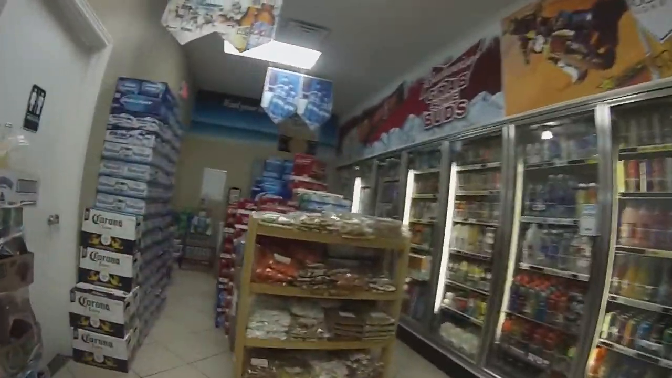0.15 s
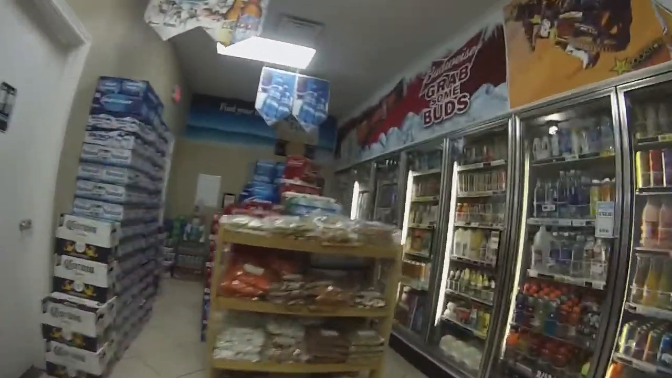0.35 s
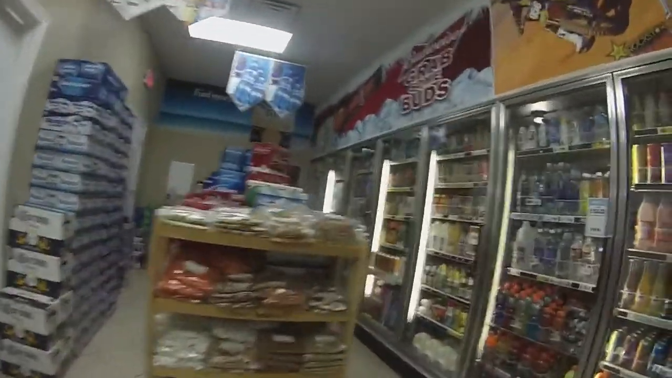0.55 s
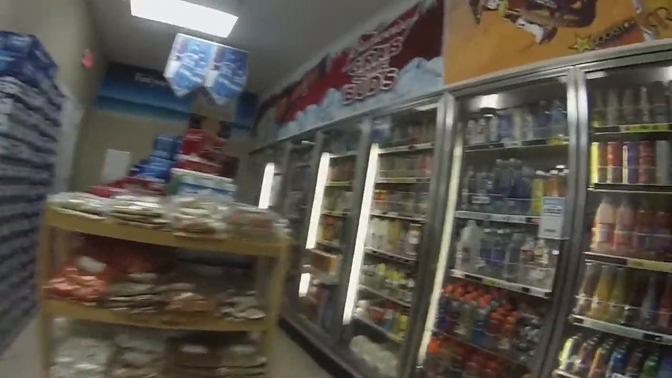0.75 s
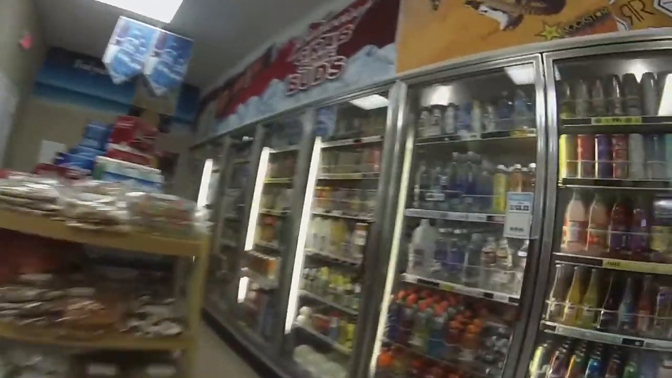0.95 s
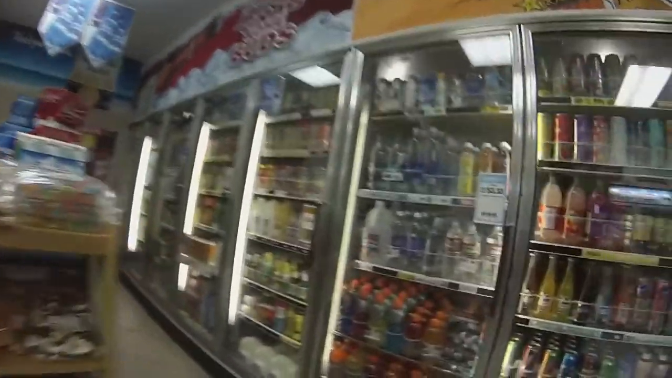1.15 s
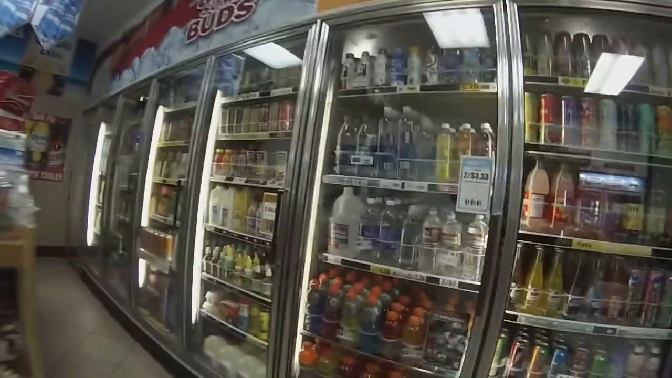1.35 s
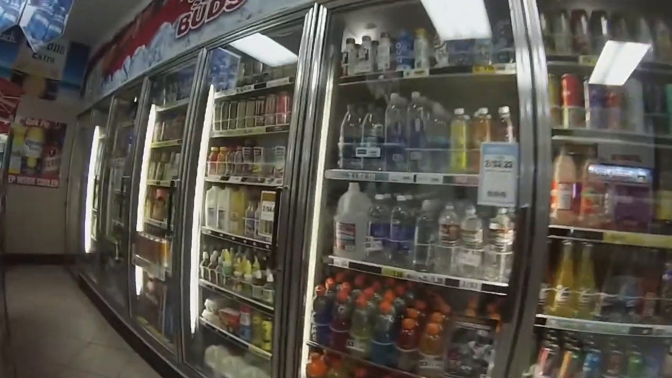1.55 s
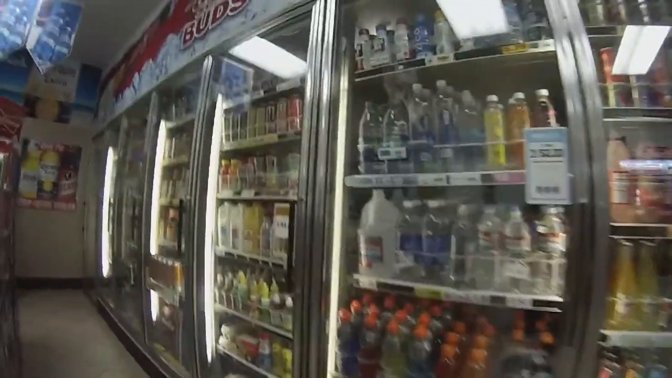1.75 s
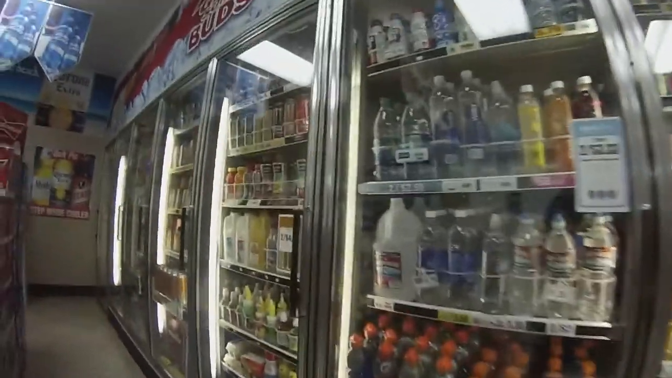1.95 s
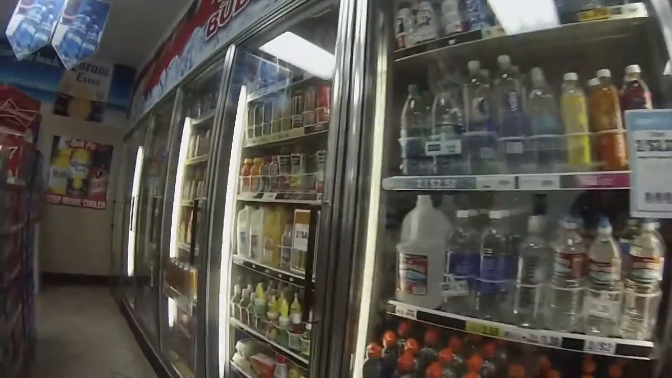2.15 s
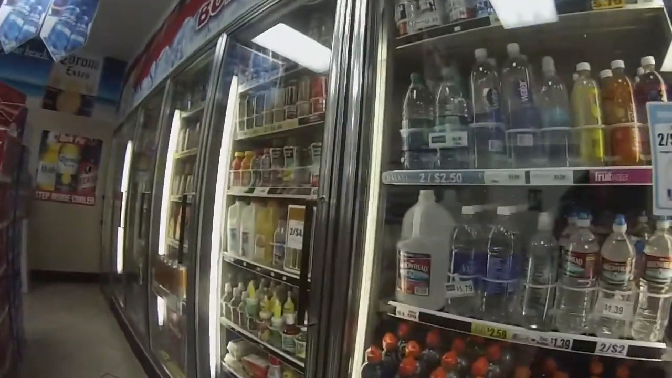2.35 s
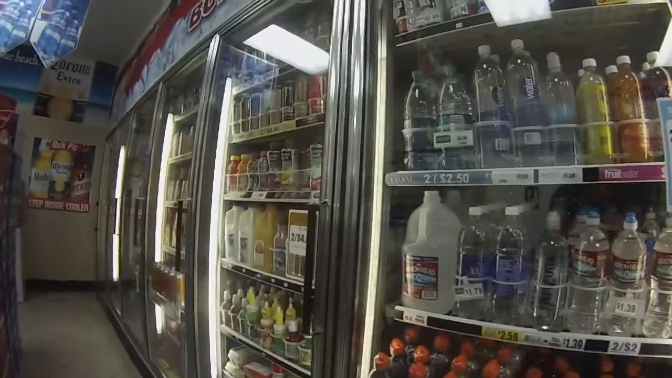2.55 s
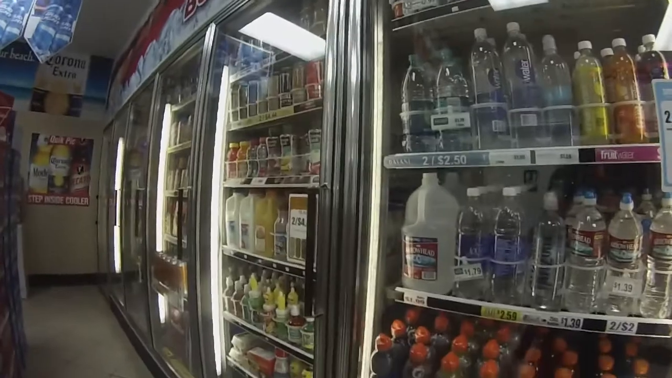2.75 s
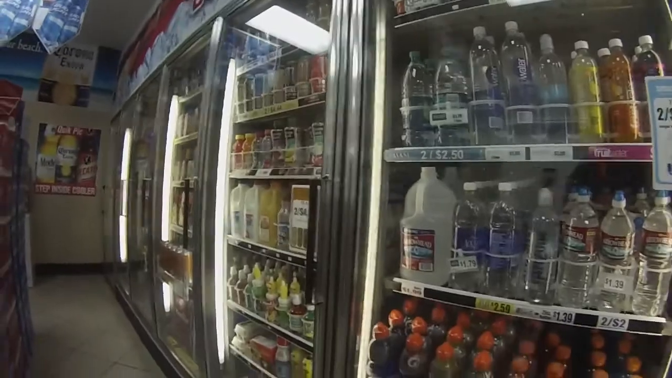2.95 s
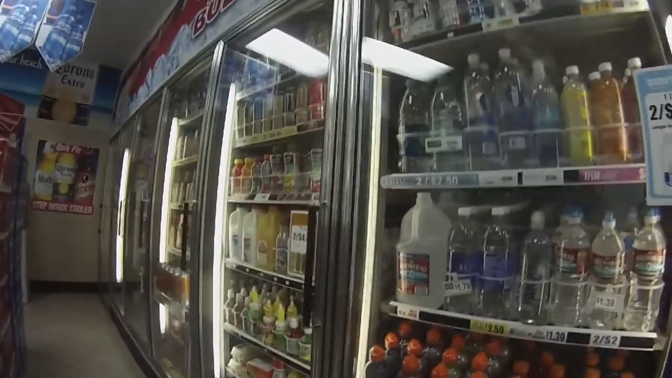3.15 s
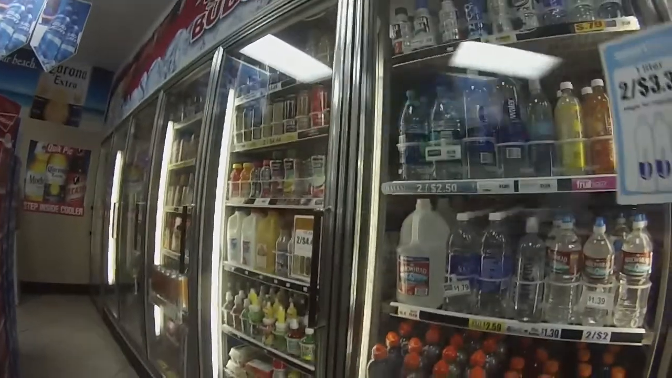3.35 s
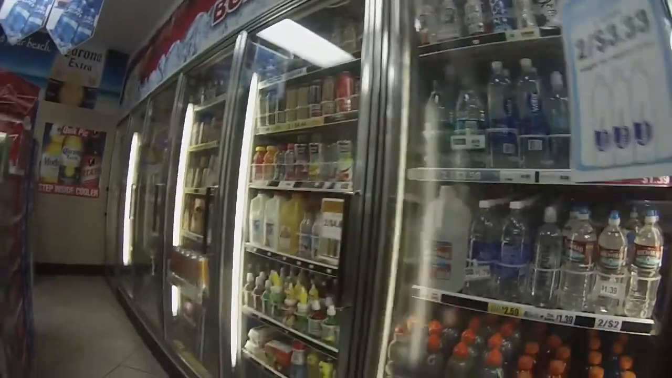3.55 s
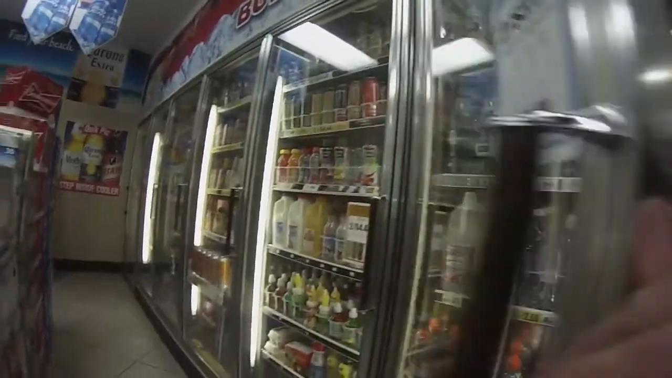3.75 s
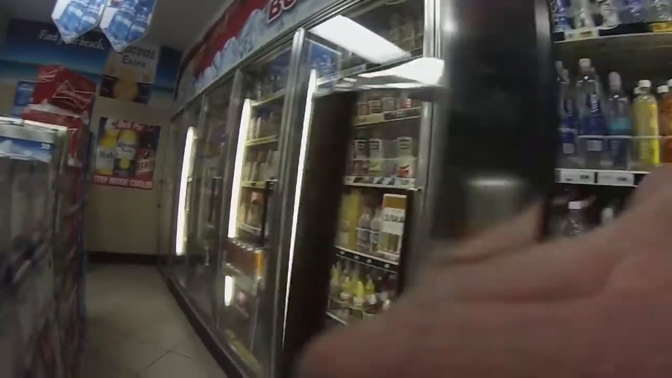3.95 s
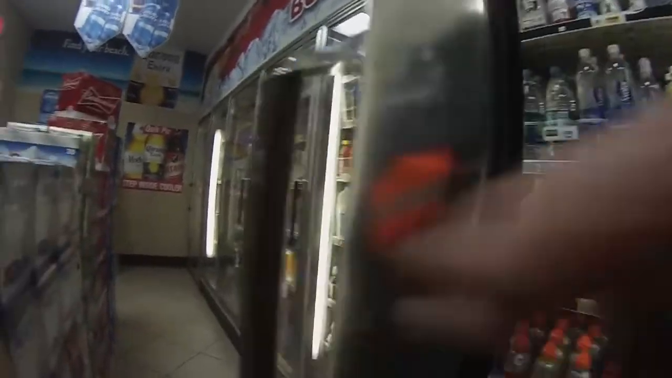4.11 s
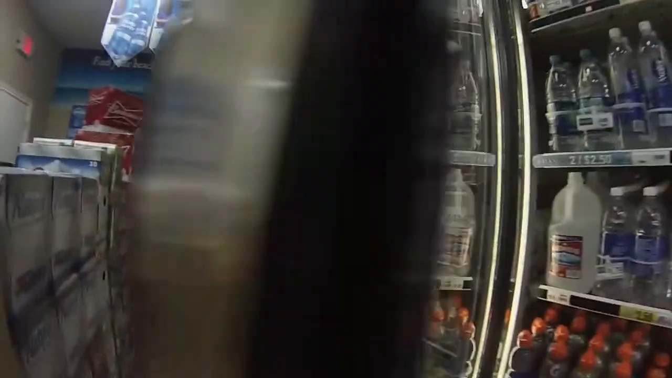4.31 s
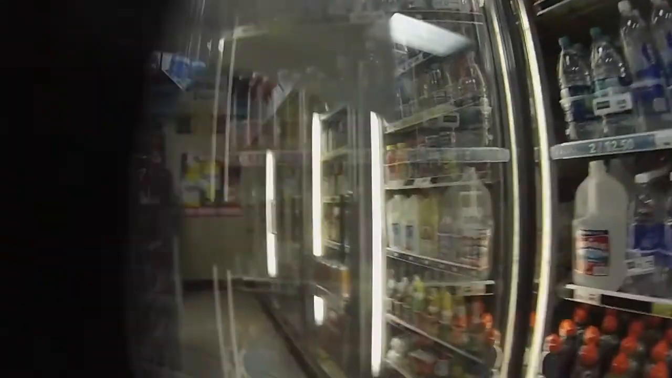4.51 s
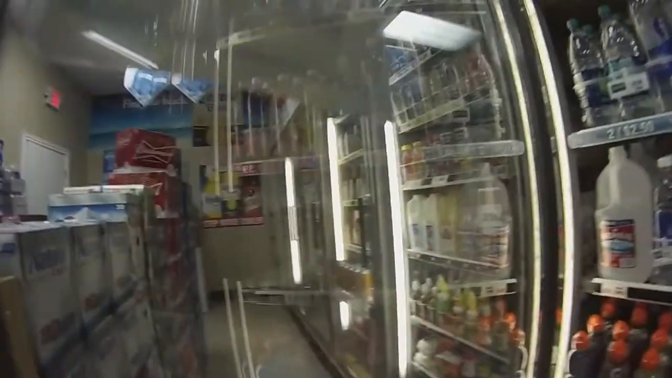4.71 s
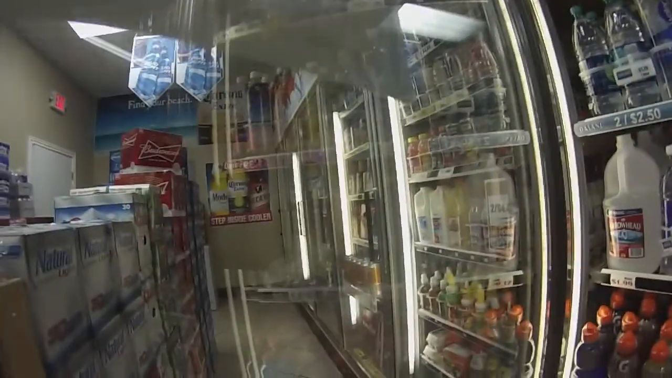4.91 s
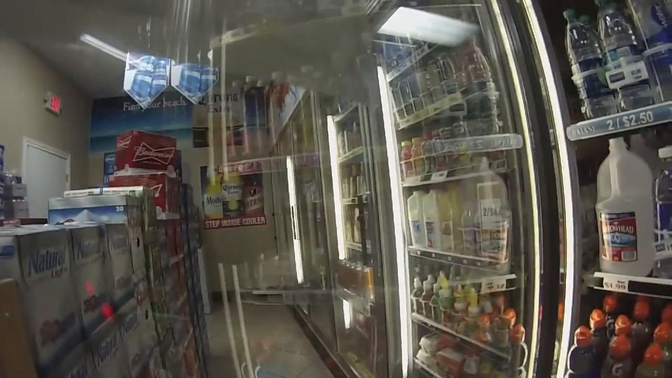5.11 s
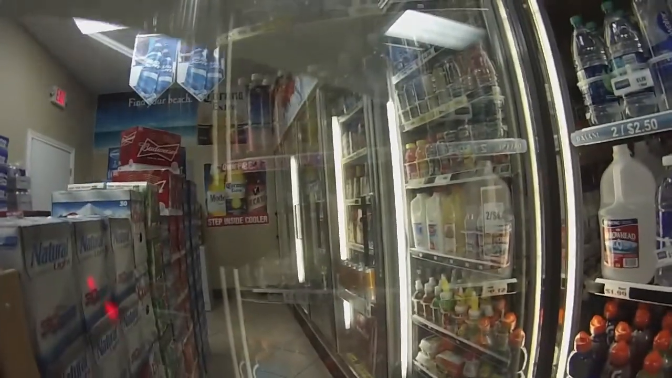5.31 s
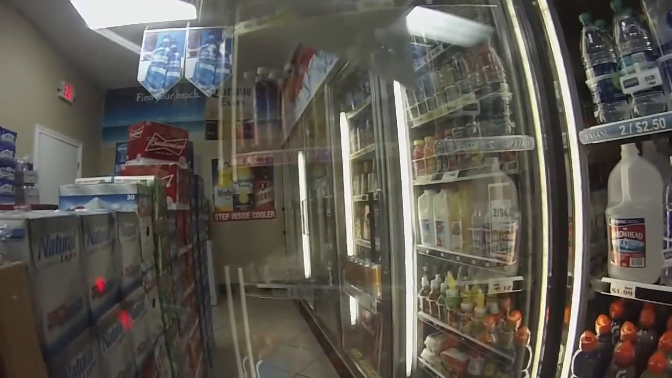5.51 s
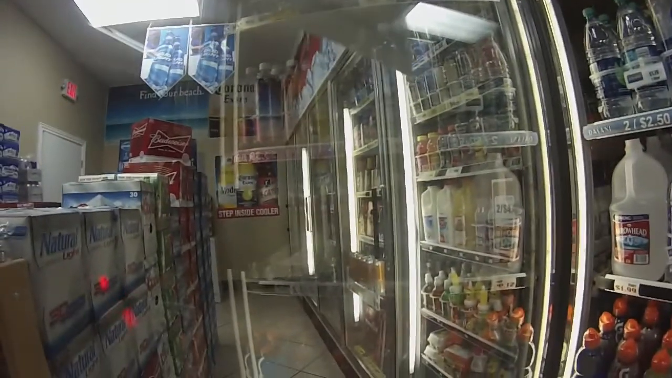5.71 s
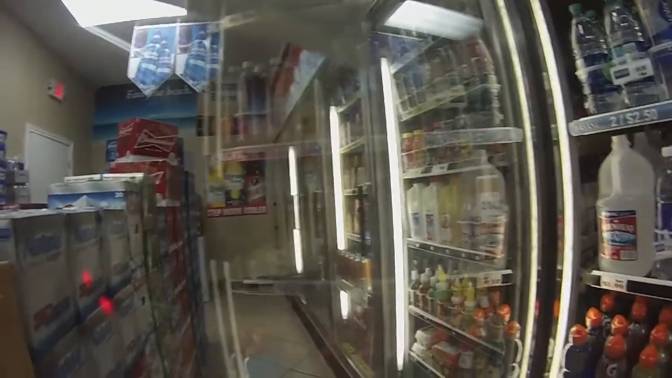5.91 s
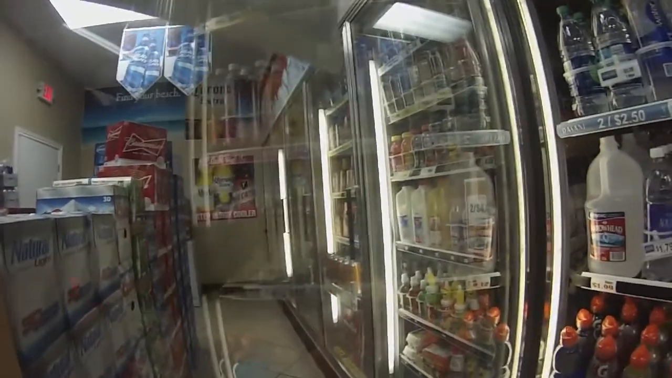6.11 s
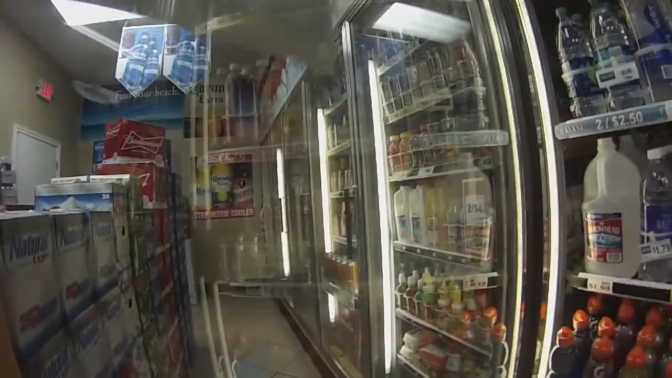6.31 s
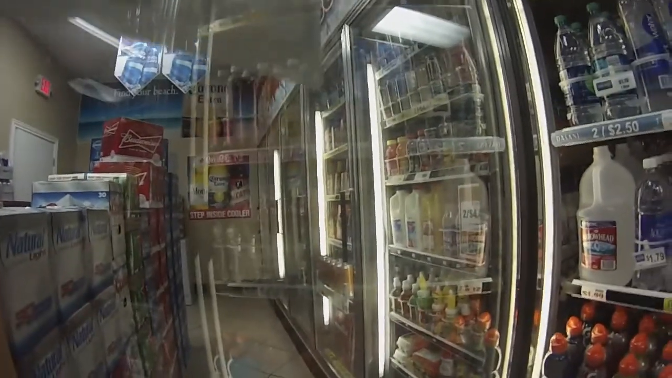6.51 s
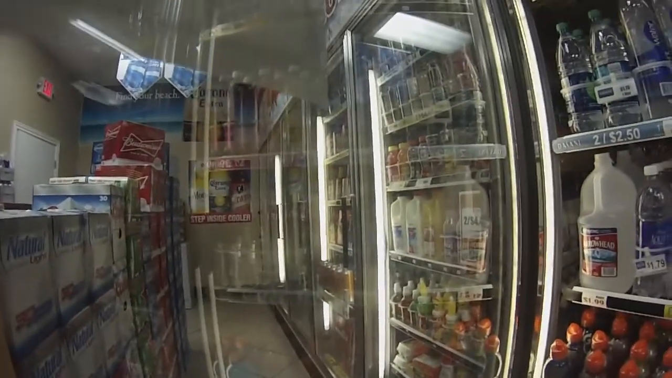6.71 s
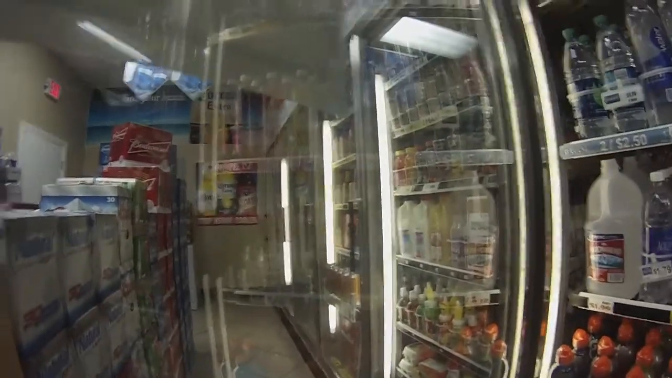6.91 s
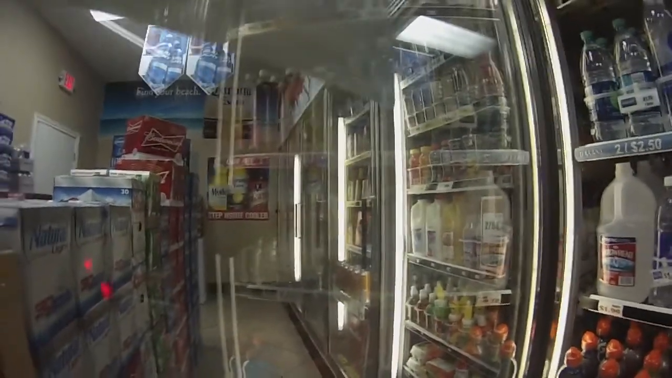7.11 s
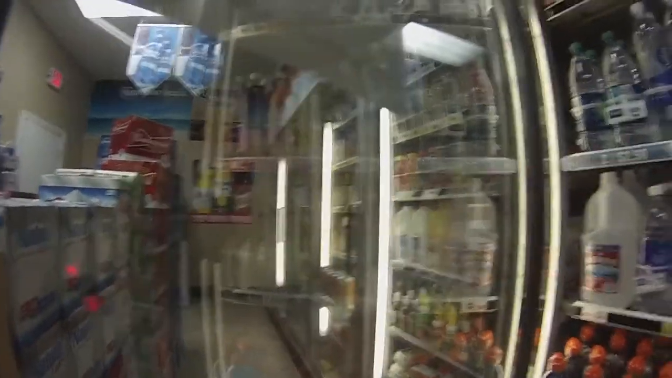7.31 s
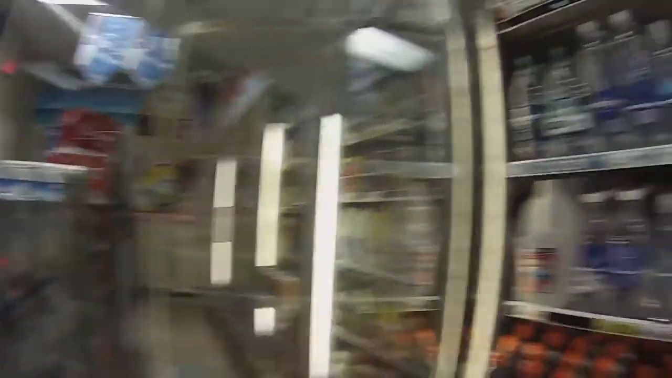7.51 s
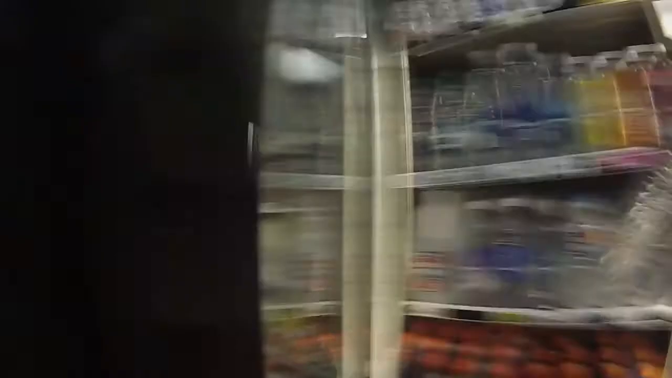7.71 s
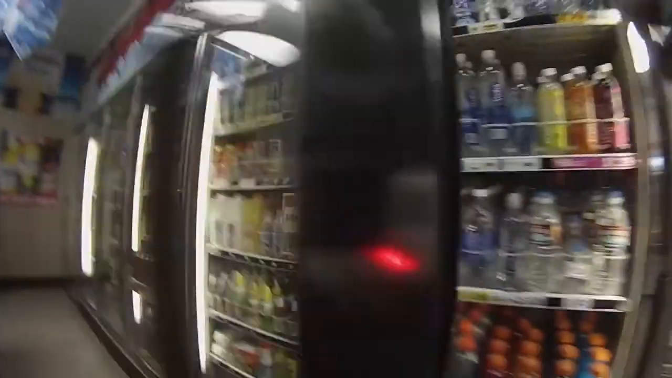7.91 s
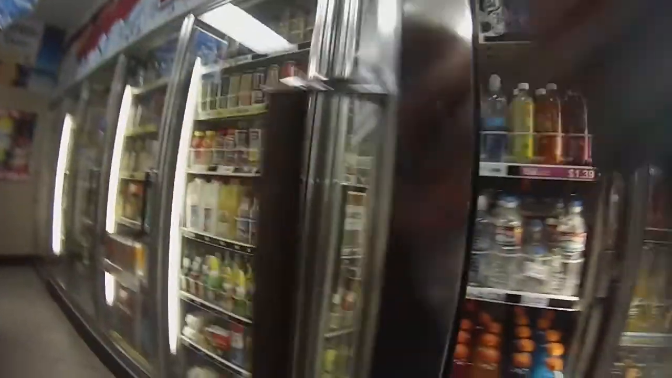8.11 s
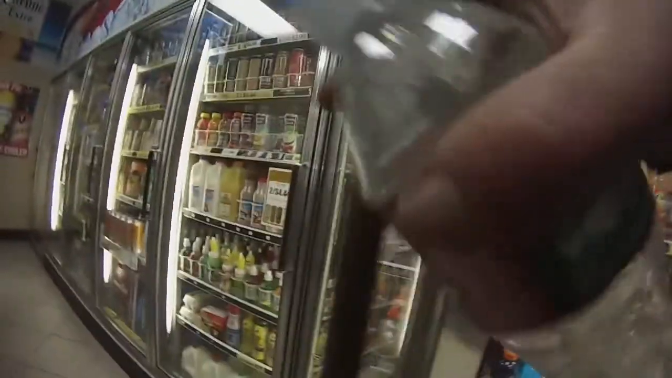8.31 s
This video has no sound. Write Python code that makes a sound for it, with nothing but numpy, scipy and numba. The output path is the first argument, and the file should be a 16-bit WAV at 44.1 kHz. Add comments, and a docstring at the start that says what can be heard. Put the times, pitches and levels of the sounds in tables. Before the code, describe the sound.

Drink coolers hum in a shop, growing louder as a door squeaks open, then a plastic bottle scrapes and knocks sharply.

```python
"""A small camera is carried through a humming shop to a row of drink coolers, with clothes rustling.
The coolers' four fans spin at slightly different speeds, so their tones throb over the rushing air.
A glass door opens with a squeak of its seal, fans and air grow louder, and the door rattles at its stop.
Plastic ticks and scrapes as a bottle is taken out. At 7.7 s a loud knock makes the camera's
automatic volume control turn everything down, and the sound then slowly comes back."""
import sys
import numpy as np
from scipy import signal
from scipy.fft import rfft, irfft, next_fast_len
from scipy.io import wavfile
from scipy.ndimage import uniform_filter1d, minimum_filter1d
from numba import njit

SR = 44100
rng = np.random.default_rng(int(sys.argv[2]) if len(sys.argv) > 2 else 0)


def persist_wave(psi):
    """Save psi, clipped to +-1, as 16-bit WAV."""
    counts = np.round(np.clip(psi, -1, 1) * 32767).astype(np.int16)
    wavfile.write(sys.argv[1], SR, np.atleast_2d(counts).T)


N = 373086
TIME = np.arange(N) / SR

# The shop's background noise: (pitch [Hz], relative level [dB])
SHOP_NOISE = [(22, -6), (35, -4), (52, -18.5), (90, -7.5), (150, -7), (300, -11), (600, -31), (1100, -24.5),
              (1500, -37.5), (2500, -40), (5000, -51), (9000, -61), (15000, -62.5)]
# Steady tones of fan shafts, motors and mains power: (pitch [Hz], base level [dB])
HUM_TONES = [(26.5, -47), (29.6, -52), (37.4, -55), (39.6, -53), (60, -52), (79.5, -53), (120, -34.8)]
# The cooler's rushing air: (pitch [Hz], relative level [dB])
AIR_NOISE = [(30, -18.5), (100, -6.5), (200, -6), (265, -3), (340, 0), (560, -2), (800, -6), (1050, -13.5),
             (1400, -24.5), (2200, -27.5), (4000, -36.5), (6000, -51.5), (8000, -52.5), (11500, -55.5),
             (14500, -67.5)]
# Pitches at which the air in the cooler rings: (pitch [Hz], width [Hz], boost [dB])
CABINET_RINGS = [(148, 34, 8.5), (189, 22, 6.5), (401, 48, 5), (462, 31, 0), (607, 94, 3), (697.6, 20, 7.5),
                 (767, 19, 6.5), (961, 77, 7.5), (1220, 89, 2)]
# Four fans: (blade rate [Hz], relative level at 1, 2, 3 and 4 times that rate [dB])
FAN_TONES = [(153.2, -6, -3, -16, -28), (160.1, 0, -3, -14, -15), (160.75, -14, -16, -12, -19),
             (162.9, -7, -1, -6.5, -26)]
# How near the open cooler sounds: (time [s], fan level [dB], overtone boost [dB], air level [dB])
NEARNESS = [(0, -36.5, -9, -39.5), (.5, -40.5, 1, -41), (1.3, -46.5, 5.5, -41),
            (2.398, -30.5, -13.5, -41.5), (2.8, -35.5, -6, -41), (3.5, -31, -2, -34.5),
            (4.301, -27.5, 1.5, -25), (4.749, -19.5, -2, -22.5), (6.399, -21, -1, -22),
            (6.9, -18.5, -4, -22.5), (7.5, -20, -4, -23), (8.1, -20.5, -1, -22.5), (8.46, -18.5, -3, -22)]
# Rustles of clothes and handling, the door seal's brief squeak, and the door's rattle at its stop:
# (peak time [s], level [dB], rise [s], fall [s], brightest pitch [Hz], boost there [dB])
RUBS = [(.14, -45.5, .3, 0.14, 5600, 8), (.17, -50.5, 0.24, 0.086, 2540, 17.5),
        (.31, -48, 0.18, .06, 5400, 2), (.51, -49.5, 0.11, 0.17, 5360, 4),
        (.7, -46.5, 0.16, 0.14, 1980, 13), (.95, -45.5, 0.32, 0.23, 3830, 2),
        (1.14, -46.5, 0.15, 0.47, 2870, -2), (1.48, -51, 0.12, 0.1, 3800, -4),
        (1.85, -49.5, 0.17, 0.09, 10700, -7), (2.01, -44, 0.22, 0.2, 3800, 1.5),
        (2.28, -49.5, 0.15, 0.19, 10700, -1), (2.4, -53, 0.19, 0.1, 3480, 6),
        (2.5, -46.5, 0.062, 0.055, 5400, 1), (2.93, -35.5, 0.013, 0.09, 3280, -6),
        (3.25, -48.5, 0.36, 0.21, 3050, 0), (3.385, -57, 0.1, 0.071, 5430, 11),
        (4.06, -32.5, 0.028, 0.02, 3670, 11.5), (4.83, -35.5, .02, 0.19, 2800, -8),
        (4.875, -21.5, 0.015, 0.056, 3640, 0), (4.97, -35.5, 0.08, 0.14, 3180, 8),
        (7.37, -38, 0.19, 0.012, 2620, 13.5), (7.482, -32.5, 0.15, 0.08, 2630, -1),
        (7.84, -33.5, 0.11, 0.95, 1820, 5.5), (8.39, -49, 0.32, .6, 3200, 20)]
# Pitches at which the rubbed things ring: (pitch [Hz], width [Hz], relative level [dB])
RUB_RINGS = [(826, 380, 22.5), (1880, 740, -5.5), (2460, 530, 0.5), (3130, 580, 1), (3790, 1200, -1),
             (4780, 890, -4.5), (5440, 450, -10), (6600, 1700, -9.5), (8580, 1400, -11.5),
             (10500, 3000, -9.5), (13500, 2800, -15)]
# Gritty strokes over plastic:
# (peak time [s], level [dB], rise [s], fall [s], brightest pitch [Hz], boost there [dB])
SCRAPES = [(7.615, -31, .17, 0.096, 2320, 2), (7.66, -20.5, .02, 0.0084, 2600, 1.9),
           (7.677, -31, .03, 0.022, 2250, 5), (7.706, -21, .05, 0.024, 2600, 2),
           (7.738, -12.5, .006, 0.084, 850, 4.6), (7.778, -12, .047, .008, 1900, 5.7)]
# Pitches at which plastic rings: (pitch [Hz], base width [Hz], relative level when scraped [dB])
PLASTIC_RINGS = [(837, 250, 6), (1185, 230, -3.5), (2010, 340, -10), (2360, 370, -12.5), (2590, 320, -11),
                 (3520, 350, -17), (4850, 450, -11.5), (5590, 290, -19), (6320, 960, -15),
                 (8300, 880, -17.5), (9660, 880, -15.5), (12500, 2100, -22)]
# Ticks and knocks of plastic: (time [s], peak level [dB], brightest pitch [Hz], fade time [s])
PLASTIC_TICKS = [(.37, -44.5, 1710, 0.023), (.4264, -54, 3500, .015), (1.135, -38, 2800, .015),
                 (2.073, -35, 1960, .02), (2.9265, -27.5, 3550, 0.0037), (2.949, -44, 3000, 0.012),
                 (2.974, -38, 2240, .02), (3.128, -47, 3280, .02), (3.3034, -33.5, 2050, 0.015),
                 (3.303, -38.5, 3200, 0.018), (4.814, -25.5, 3100, 0.02), (4.851, -38, 2900, .015),
                 (4.8195, -31, 4200, .012), (4.865, -17, 1700, 0.015), (4.87, -18, 2640, 0.07),
                 (5.018, -28, 2780, .02), (5.468, -29, 5370, 0.095), (5.47, -27.5, 2690, .03),
                 (5.8, -42, 6000, 0.017), (5.926, -26, 5400, 0.023), (5.927, -31, 1920, .015),
                 (6.787, -36.5, 5360, 0.019), (6.945, -41, 5000, 0.05), (7.006, -45, 8950, .015),
                 (7.2565, -26.5, 3680, 0.021), (7.2916, -35, 4500, .015), (7.3282, -26.5, 5500, 0.03),
                 (7.333, -37, 5000, .015), (7.358, -38, 9000, .01), (7.365, -26.5, 5030, 0.022),
                 (7.43, -31.5, 4970, .015), (7.484, -26, 8100, 0.033), (7.4845, -23, 2700, .02),
                 (7.656, -19, 6730, 0.035), (7.676, -18.5, 2300, .02), (7.6946, -15, 3600, 0.024),
                 (7.71, -25, 5500, .015), (7.7205, 11, 5500, 0.0017), (7.731, 13.5, 5420, 0.0037),
                 (7.7307, 12.5, 2270, 0.025), (7.7898, -2, 5370, 0.015), (7.9984, -31, 6560, 0.023),
                 (8.2434, -38, 7000, 0.0088), (8.263, -26, 4740, 0.011)]
# Faint crinkles: (start [s], end [s], count, lowest level [dB], level scatter [dB],
# brightest pitch from [Hz], to [Hz], fade time [s])
CRINKLES = 4.4, 7.25, 20, -54, 2.5, 8500, 11000, .04
# Footsteps, the shaking door frame and knocks on the camera:
# (time [s], pitch [Hz], level [dB], fade time [s])
DULL_THUMPS = [(.468, 712, -22, 0.049), (2.309, 735, -30, 0.043), (2.928, 1100, -18, 0.017),
               (4.879, 35.7, -5, 0.24), (7.7308, 817, 23.5, 0.019), (7.737, 736, -1.5, 0.25),
               (7.775, 880, 4, 0.03)]
# The glass door ringing as it meets its stop: (pitch [Hz], level [dB], fade time [s])
DOOR_RINGS = [(573, -10.5, 0.094), (740, -12, 0.061), (1176, -9, 0.083), (1610, -20, 0.058)]
# Pitches at which the microphone's opening rings: (pitch [Hz], width [Hz], boost [dB])
MIC_RINGS = [(1880, 450, 4.5), (3850, 400, 3.), (5500, 400, 4.5), (6700, 800, 3.)]

DOOR_STOP_S = 4.869
CONTACT_WIDTH = .1  # each touch has a narrow ring of its own; its width as a share of its pitch
HARD_HIT_DB = -20  # ticks above this level ring the plastic more evenly
ATTACK_S, LOOK_AHEAD_S, RECOVER_DB_PER_S = .0004, .0004, 14.5  # the automatic volume control


def undb(db):
    """Turns decibels into a number to multiply by."""
    return 10 ** (np.asarray(db) / 20)


def unit(x):
    """Scales a sound to an average strength (rms) of 1."""
    return x / np.sqrt(np.mean(x ** 2))


def drift(rate):
    """A smooth random wobble that heads for a new value `rate` times a second."""
    hold = int(SR / rate)
    steps = np.repeat(rng.standard_normal(N // hold + 1), hold)
    return unit(uniform_filter1d(uniform_filter1d(steps, hold), hold)[:N])


def ring(x, hz, width_hz):
    """Keeps the part of a sound near one pitch, as a ringing object does."""
    return signal.lfilter(*signal.iirpeak(hz, hz / width_hz, SR), x)


def narrow_ring(x, hz, width_hz):
    """Rings a sound twice for a purer pitch, at strength 1."""
    return unit(ring(ring(x, hz, width_hz), hz, width_hz))


def boost(x, rings):
    """Makes a sound louder at the pitches where a hollow space rings."""
    return x + sum((undb(db) - 1) * ring(x, hz, width) for hz, width, db in rings)


def rushing_noise(spectrum, swell_db, flicker_db):
    """Shaped noise whose octaves swell together slowly while each one flickers by itself."""
    hz, db = np.transpose(spectrum)
    size = next_fast_len(N)
    octave = np.log2(np.maximum(np.fft.rfftfreq(size, 1 / SR), 1))
    noise = rfft(rng.standard_normal(size)) * undb(np.interp(octave, np.log2(hz), db, left=-90))
    swell = swell_db * drift(1)
    bands = (irfft(noise * np.clip(1 - abs(octave - k), 0, 1), size)[:N] for k in range(4, 16))
    return unit(sum(band * undb(swell + flicker_db * drift(9)) for band in bands))


def hum():
    """Shafts, motors and mains power give low tones that waver a little in loudness."""
    return sum(np.sqrt(2) * undb(db + drift(1.5)) * np.sin(2 * np.pi * (hz * TIME + rng.random()))
               for hz, db in HUM_TONES)


def cooler_air():
    """Rushing air makes the hollow cabinet ring."""
    return unit(boost(rushing_noise(AIR_NOISE, swell_db=.15, flicker_db=.5), CABINET_RINGS))


def fans(overtone_db, waver_hz=.1, waver_db=.8):
    """Each fan's passing blades make a tone with overtones; close pitches throb against each other."""
    out = 0
    for hz, *levels in FAN_TONES:
        blade_passes = np.cumsum(hz + waver_hz * drift(1.438)) / SR
        for k, db in enumerate(levels):
            gain = undb(db + (k > 0) * overtone_db + waver_db * drift(2.48))
            out = out + gain * np.sin(2 * np.pi * ((k + 1) * blade_passes + rng.random()))
    return out


def rubbing(strokes, rings, grit_db):
    """Many tiny, uneven slips make a rubbed thing ring; each stroke swells and fades."""
    slips = rng.standard_normal(N)
    slip_sizes = np.minimum(rng.exponential(size=N // 40 + 1), 4)
    slips *= undb(grit_db * np.repeat(slip_sizes, 40)[:N])
    first = max(int((strokes[0][0] - 1) * SR), 0)
    ringing = [narrow_ring(slips[first:], hz, width) for hz, width, _ in rings]
    ring_hz, _, ring_db = np.transpose(rings)
    out = np.zeros(N)
    for peak_s, db, rise, fall, bright_hz, boost_db in strokes:
        start = max(int((peak_s - 2 * rise) * SR), first)
        end = min(int((peak_s + 2 * fall) * SR), N)
        distance = np.log2(ring_hz / bright_hz) ** 2  # octaves from the brightest pitch, squared
        gains = undb(ring_db - distance + boost_db * np.exp(-distance / .05))
        body = sum((-1) ** k * gains[k] * x[start - first:end - first] for k, x in enumerate(ringing))
        contact = narrow_ring(slips[start:end], bright_hz, CONTACT_WIDTH * bright_hz)
        sound = body + undb(-8) * gains[np.argmin(distance)] * contact
        t = TIME[start:end] - peak_s
        swell_db = db - 20 * np.where(t < 0, -t / rise, t / fall) ** 1.5  # rise and fall span 20 dB
        out[start:end] += undb(swell_db) * sound / np.linalg.norm(gains)
    return out


def add(out, time_s, sound):
    """Mixes a short sound in at the given time."""
    start = int(time_s * SR)
    out[start:start + len(sound)] += sound[:N - start]


def crinkles():
    """Lists faint, bright ticks at random times."""
    start, end, count, db, scatter_db, low_hz, high_hz, fade_s = CRINKLES
    return [(start + (end - start) * when, db - scatter_db * np.log(1 - size),
             low_hz + (high_hz - low_hz) * pitch, fade_s)
            for when, size, pitch in rng.random((count, 3))]


def plastic_ticks():
    """A short crackling touch makes plastic ring, most strongly near the touch's brightest pitch."""
    out, t = np.zeros(N), TIME[:int(.15 * SR)]
    ticks = PLASTIC_TICKS + crinkles()
    scatter_db = 1.5 * rng.standard_normal((len(ticks), len(PLASTIC_RINGS)))
    for (time_s, db, bright_hz, fade_s), chance_db in zip(ticks, scatter_db):
        contact = rng.standard_normal(len(t)) * np.exp(-np.log(1000) * t / max(fade_s, .002))
        contact[0] = .8 * np.linalg.norm(contact)  # the first touch is the hardest
        falloff_db, treble_cut_db = (1.2, 4) if db > HARD_HIT_DB else (3, 0)
        contact_width = CONTACT_WIDTH * bright_hz
        sound = undb(7) * ring(contact, bright_hz, contact_width) / np.sqrt(contact_width)
        if bright_hz > 3600:  # the hollow body rings under bright ticks
            sound += undb(3) * ring(contact, hz=2750, width_hz=320) / np.sqrt(320)
        for k, (hz, width, _) in enumerate(PLASTIC_RINGS):
            distance = np.log2(hz / bright_hz) ** 2
            ring_db = chance_db[k] - falloff_db * distance + 4 * np.exp(-distance / .04)
            ring_db -= treble_cut_db * max(np.log2(hz / 4000), 0)
            sound += (-1) ** k * undb(ring_db) * ring(contact, hz, 4 * width) / np.sqrt(width)
        cutoff_hz = min(bright_hz ** 2 / 1900, .4 * SR)  # duller touches give way and lose treble
        sound = signal.lfilter(*signal.butter(2, cutoff_hz, fs=SR), sound)
        add(out, time_s, undb(db) * sound / abs(sound).max())
    return out


def thumps():
    """Dull blows and the door meeting its stop ring as fading tones, roughened by noise."""
    out, t = np.zeros(N), TIME[:int(.6 * SR)]
    for time_s, hz, db, fade_s in DULL_THUMPS + [(DOOR_STOP_S, *row) for row in DOOR_RINGS]:
        roughness = narrow_ring(rng.standard_normal(len(t)), hz, .5 * hz)
        fade = np.exp(-np.log(1000) * t / fade_s)  # down 60 dB after the fade time
        onset = 1 - np.exp(-t * hz)
        add(out, time_s, undb(db) * onset * fade * (np.sin(2 * np.pi * hz * t) + .3 * roughness))
    return out


@njit
def volume_control(x, coming_peak, attack, release):
    """Turns the sound down fast when a peak above full scale is coming, then slowly back up."""
    out, turn_down = np.empty(len(x)), 1.
    for i in range(len(x)):
        if coming_peak[i] > turn_down:
            turn_down += attack * (coming_peak[i] - turn_down)
        else:
            turn_down = max(1., turn_down * release)
        out[i] = x[i] / turn_down
    return out


def scene():
    """Mixes the coolers, the shop and the handling sounds into one channel."""
    times, *columns = np.transpose(NEARNESS)
    fan_db, overtone_db, air_db = (np.interp(TIME, times, column) for column in columns)
    cooler = undb(fan_db) * fans(overtone_db) + undb(air_db) * cooler_air()
    shop = undb(.12 * (air_db - air_db[0])) * hum()  # the hum grows a little with the air
    shop += undb(-39) * rushing_noise(SHOP_NOISE, swell_db=.4, flicker_db=.9)
    rubs = rubbing(RUBS, RUB_RINGS, grit_db=1.9)
    scraped_rings = [(hz, 1.5 * width, db) for hz, width, db in PLASTIC_RINGS]
    scrapes = rubbing(SCRAPES, scraped_rings, grit_db=2.4)
    return (shop + cooler + rubs + scrapes + plastic_ticks() + thumps())[None]


def record(dry):
    """The camera's microphone opening rings, loud knocks duck the volume, and the top treble is cut."""
    mic = boost(dry[0], MIC_RINGS)
    ahead = int(LOOK_AHEAD_S * SR)
    sensed = abs(mic + np.diff(mic, prepend=0))  # the volume control hears treble louder
    coming_peak = np.roll(-minimum_filter1d(-sensed, size=ahead), -ahead // 2)
    ducked = volume_control(mic, coming_peak, 1 / (ATTACK_S * SR), float(undb(-RECOVER_DB_PER_S / SR)))
    clipped = np.clip(ducked, -1, 1)  # the first instant of a knock still overloads
    treble_cut = signal.ellip(10, .2, 80, 15300, fs=SR, output="sos")
    return signal.sosfilt(treble_cut, clipped)[None]


dry = scene()
out = record(dry)
persist_wave(out)
```